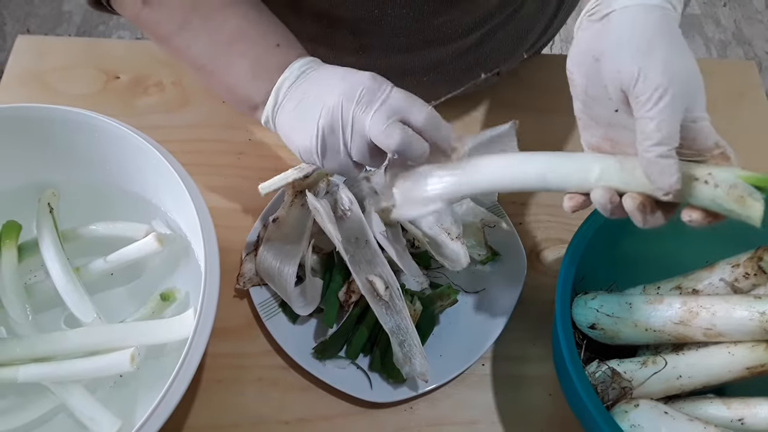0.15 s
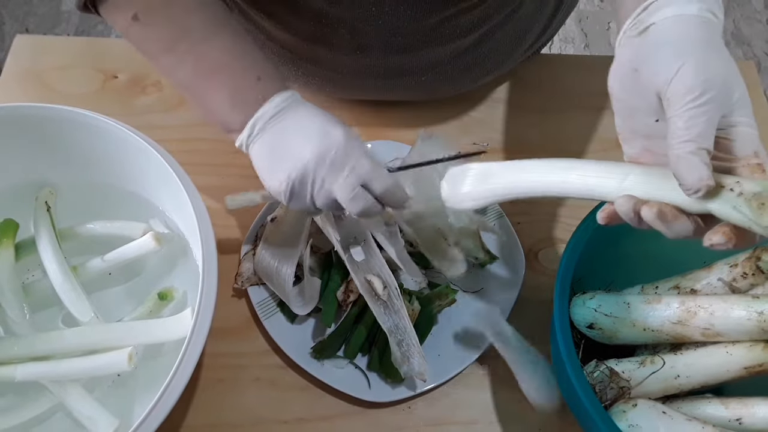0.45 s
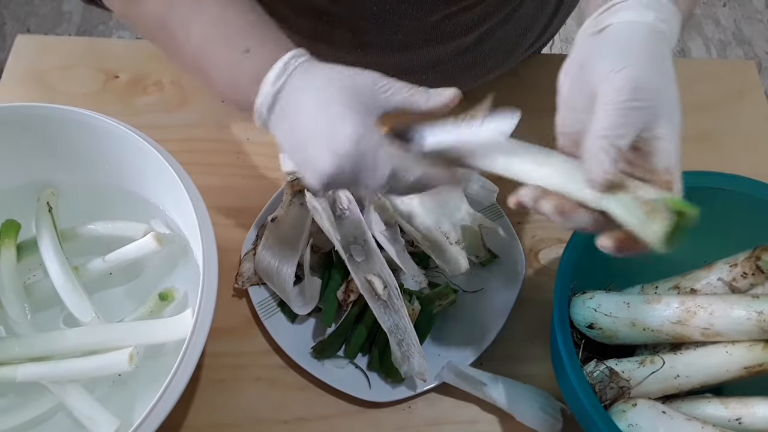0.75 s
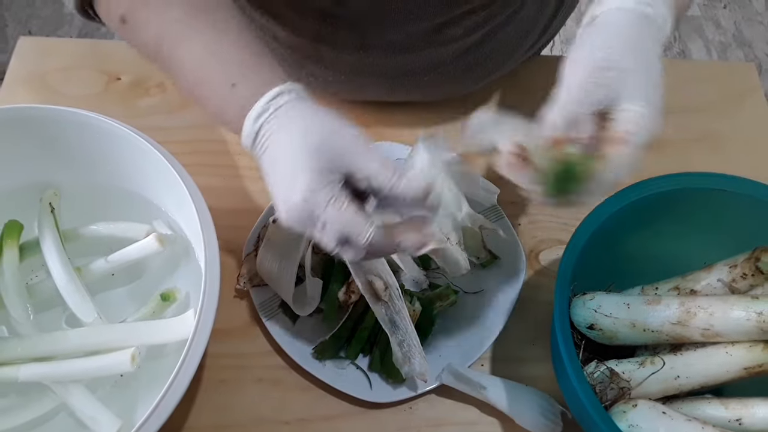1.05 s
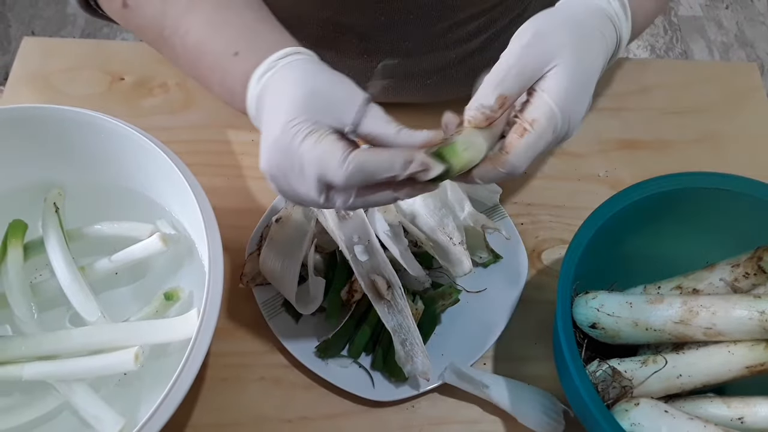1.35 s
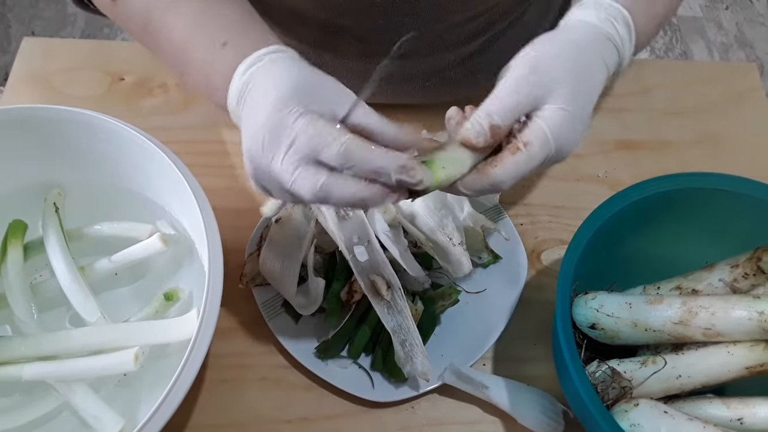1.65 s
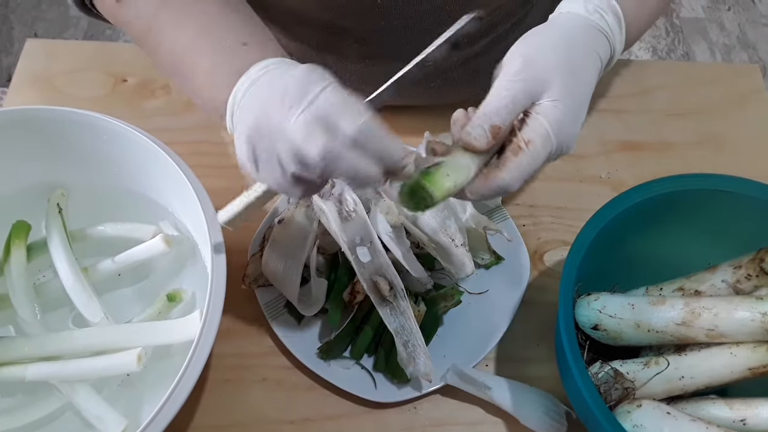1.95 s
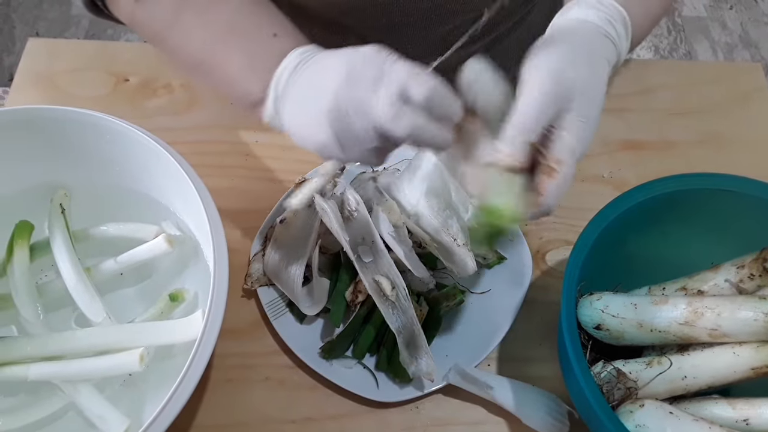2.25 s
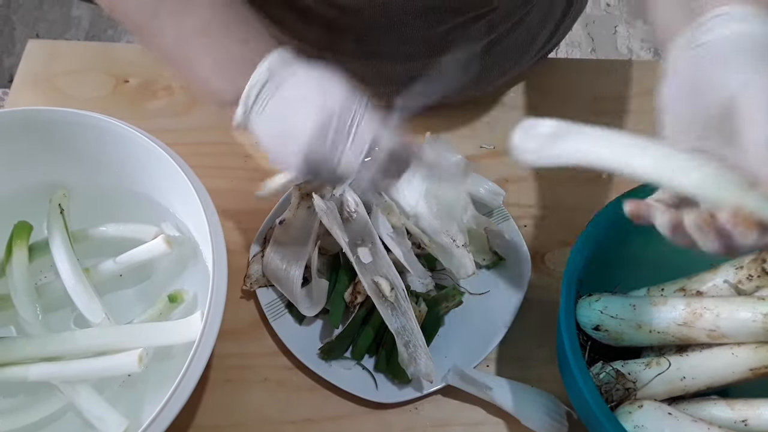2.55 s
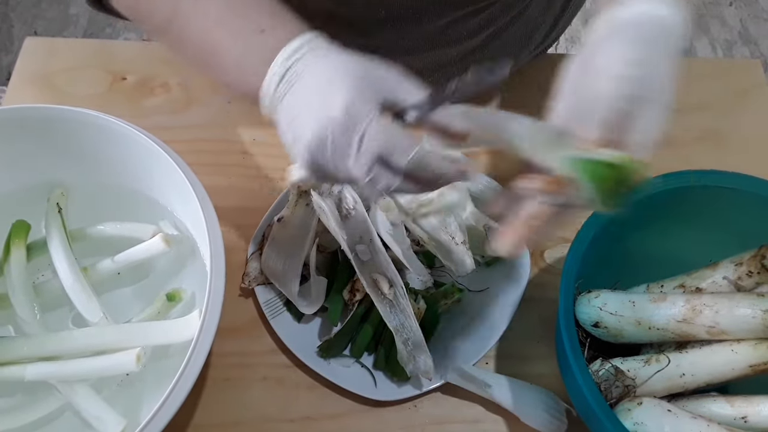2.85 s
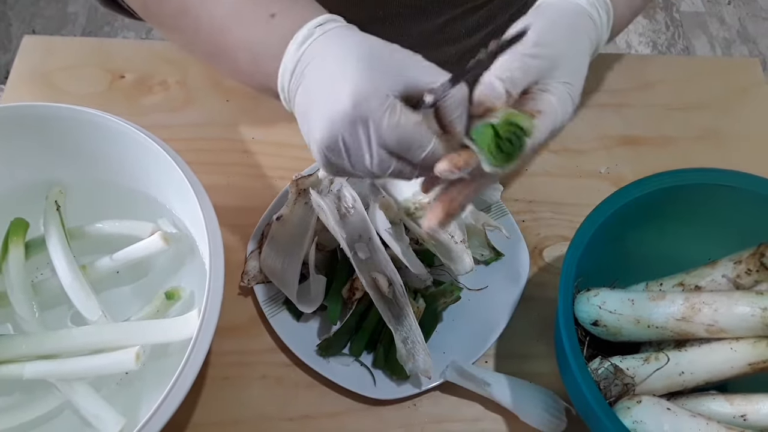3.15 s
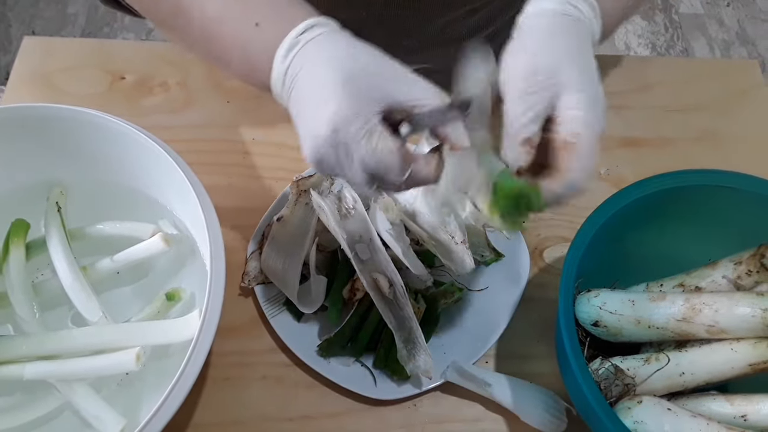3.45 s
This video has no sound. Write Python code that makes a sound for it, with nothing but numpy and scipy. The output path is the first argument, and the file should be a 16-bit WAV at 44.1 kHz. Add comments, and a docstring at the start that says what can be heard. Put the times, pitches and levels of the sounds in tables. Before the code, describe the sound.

Tough onion leaves tear in crisp, hissy, bright crackles. Light snaps open the scene, with trimmings knocking dully on plate and table from 0.14 to 0.7 seconds. Sparse faint ticks follow until 1.9, when ripping swells, strongest at 2.2-2.5. After a lull, sharp dense tearing resumes from 3.1 to the end. Quiet room noise, low hum, very faint whines and a short echo surround the close, slightly ringing microphone.

```python
"""Tearing onion leaves

Gloved hands tear the tough outer leaves off long onions over a plate in a quiet kitchen.
Snapping fibres are short bursts of noise, with louder single cracks; trimmings knock on plate and
table, made of resonances struck and kept rough by noise. Room noise, a hum and two thin whines
lie below, a noise tail is the room's echo, and the small microphone rings near 8 kHz."""
import sys
import numpy as np
from scipy import signal
from scipy.fft import rfft, irfft
from scipy.io import wavfile
from scipy.ndimage import uniform_filter1d

SR = 44100
rng = np.random.default_rng(int(sys.argv[2]) if len(sys.argv) > 2 else 0)


def dump_mix(stems):
    """Bounce the given channels to the path in sys.argv[1] as a 16-bit WAV at rate SR."""
    frames = np.atleast_2d(stems).T  # one column per channel
    limited = np.clip(frames, -1, 1)  # hard clip at full scale
    pcm = np.round(limited * 32767).astype(np.int16)
    wavfile.write(sys.argv[1], SR, pcm)


N = 158760

MIC_FLAT_DB = -16  # the microphone away from its resonance


def amp(db):
    """Turn decibels into a gain."""
    return 10 ** (np.asarray(db, float) / 20)


def unit(x):
    """Scale a signal to an rms of 1."""
    return x / np.sqrt(np.mean(x ** 2))


def band(x, low_hz, high_hz):
    """Keep only the frequencies between two limits."""
    return signal.sosfilt(signal.butter(2, [low_hz, high_hz], "band", fs=SR, output="sos"), x)


def peak(x, hz, width_hz):
    """One resonance, with a gain of 1 at its centre."""
    return signal.lfilter(*signal.iirpeak(hz, hz / width_hz, SR), x)


def fade(count, t60_s):
    """Exponential decay that falls by 60 dB in t60_s."""
    return 1000. ** (-np.arange(count) / SR / t60_s)


def walk(rate_hz):
    """Random levels, each held for 1 / rate_hz seconds, with smoothed steps and an rms of 1."""
    hold = int(SR / rate_hz)
    levels = rng.standard_normal(N)[:N // hold + 1]
    steps = np.repeat(levels, hold)[:N]
    return unit(uniform_filter1d(steps, hold // 2 + 1))


def mic(x):
    """The microphone passes all sound evenly, while its port resonates narrowly on a wide skirt."""
    port_hz, width_hz, skirt_width_hz, skirt_db = 7895, 600, 2400, -10
    ringing = peak(x, port_hz, width_hz)
    skirt = amp(skirt_db) * peak(x, port_hz, skirt_width_hz)
    return amp(MIC_FLAT_DB) * x + ringing + skirt


def air():
    """Room noise is shaped noise that swells gently; the hum and two whines are unsteady sines."""
    # colour of the room noise before the microphone: (frequency [Hz], relative level per Hz [dB])
    noise_colour = [(25, -27), (50, -10.5), (120, -5.5), (330, -10.5), (700, -19.5), (1670, -24.5),
                    (3000, -31.5), (5600, -43), (8000, -41.5), (11000, -78), (14000, -38), (16000, -36)]
    # hum and whines before the microphone: (frequency [Hz], rms wander [Hz], middle peak level [dB])
    steady_tones = [(118, 3, -52), (10690, 30, -75), (13360, 45, -70)]
    noise_db, swell_db, flicker_db = -48.5, 1.5, 2.5
    hz_grid = np.arange(N // 2 + 1) * SR / N + 1  # 1 Hz added so that the logarithm exists
    rows = np.array(noise_colour)
    colour_db = np.interp(np.log(hz_grid), np.log(rows[:, 0]), rows[:, 1])
    noise = irfft(rfft(rng.standard_normal(N)) * amp(colour_db), N)
    tones = 0
    for hz, wander_hz, db in steady_tones:
        loudness = amp(db + flicker_db * walk(45))
        phase = 2 * np.pi * np.cumsum(hz + wander_hz * walk(230)) / SR
        tones = tones + loudness * np.sin(phase)
    return amp(noise_db + swell_db * walk(1.0)) * unit(noise) + tones


def room(x):
    """The room answers with a dense tail of echoes that dies sooner in the treble."""
    room_db, low_t60_s, high_t60_s, delay_s = -5.5, 0.78, 0.48, .004
    noise = rng.standard_normal(SR)
    low = signal.lfilter(*signal.butter(1, 3000, fs=SR), noise)
    tail = low * fade(SR, low_t60_s) + (noise - low) * fade(SR, high_t60_s)
    tail = np.r_[np.zeros(int(delay_s * SR)), tail / np.sqrt(np.sum(tail ** 2))]
    return amp(room_db) * signal.fftconvolve(x, tail)[:N]


def ring(modes, chance):
    """A struck body rings in its modes, kept rough by a rattle that is also heard between them."""
    strike = 60  # first push, in units of the rattle
    spread_db, width_hz, rattle_db, rattle_t60_s = 2, 36, -21, .3
    shake = np.r_[strike, chance[1:]]
    x = 0
    for (hz, db, t60_s), luck in zip(modes, chance):
        # every hit excites each mode a little differently
        x = x + amp(db + spread_db * luck) * peak(shake, hz, width_hz) * fade(len(shake), t60_s)
    rattle = band(chance, 300, 2400) * fade(len(shake), rattle_t60_s)
    x = x + amp(rattle_db) * rattle
    return x / np.abs(x).max()


def knocks():
    """Landing trimmings give a tick and a plate ring, both dull if soft, and a thud of the table."""
    # landings: (time [s], tick's peak level away from the microphone's resonance [dB], tick pitch [Hz],
    # plate ring against tick before softening [dB], top of the softened sound [Hz],
    # table thud against tick before its band limits [dB])
    landings = [(.140, -33.5, 1430, -2.5, 2650, -11), (0.368, -35, 2940, -10, 5000, -7),
                (0.383, -41, 2800, -31, 3900, -13), (0.449, -28, 2300, -9, 2580, -1.5),
                (0.476, -41, 2400, -10, 2840, 1), (0.509, -47, 2930, -14, 2800, 12.5),
                (0.615, -36.5, 2830, 7.5, 9500, 1.5), (0.684, -55, 2000, 15, 9150, 19)]
    # ways the plate rings: (frequency [Hz], middle relative level [dB], decay by 60 dB [s])
    plate_modes = [(1540, -2, .3), (1950, -8, .12), (2330, -4, .3), (2546, 0, .5), (3120, -10, .12),
                   (3450, -7, .4), (4377, -14, .3), (5445, -15, .3), (6630, -19, .3)]
    # ways the table top rings: (frequency [Hz], middle relative level [dB], decay by 60 dB [s])
    table_modes = [(115, -2, .2), (200, -5, .15), (265, 0, .2), (325, -3, .2), (400, -5, .15),
                   (500, -5, .15)]
    tick_t60_s, tick_width = .014, .6  # width as a share of the tick's pitch
    out = np.zeros(N)
    chances = rng.standard_normal((len(landings), SR // 2))
    for (s, db, hz, ring_db, top_hz, thud_db), chance in zip(landings, chances):
        soften = signal.butter(4, top_hz, fs=SR)
        push = np.r_[4, chance[1:]] * fade(len(chance), tick_t60_s)
        tick = peak(peak(push, hz, hz * tick_width), hz, 2 * hz)
        tick = signal.lfilter(*soften, tick)
        plate = signal.lfilter(*soften, ring(plate_modes, chance))
        # shifted noise makes the table rattle differently from the plate
        thud = band(ring(table_modes, np.roll(chance, 20)), 61, 1200)
        hit = tick / np.abs(tick).max() + amp(ring_db) * plate + amp(thud_db) * thud
        out[int(s * SR):][:len(chance)] += amp(db - MIC_FLAT_DB) * hit
    return out


def band_db(rows):
    """Turn (level, three levels against it) into the level of each of the four bands."""
    main = rows[:, :1]
    return main + np.c_[0 * rows[:, 0], rows[:, 1:]]


def leaf(x, k, grip=1):
    """Filter noise to one band of leaf sound; the hollow stalk colours the low band, more when gripped."""
    # main, low, middle and top band: (lower limit [Hz], upper limit [Hz])
    band_limits = [(6000, 10000), (800, 2300), (2300, 6000), (10000, 15500)]
    stalk_hz, stalk_width_hz, stalk_flat_db = 1600, 420, -6
    if k == 0:  # gentler slopes for the main band
        return signal.lfilter(*signal.butter(1, band_limits[k], "band", fs=SR), x)
    y = band(x, *band_limits[k])
    if k == 1:
        return amp(stalk_flat_db) * y + grip * peak(y, stalk_hz, stalk_width_hz)
    return y


def cracks():
    """Each loud snap is a sudden click on a short noise tail with its own colour."""
    # snaps through the microphone: (time [s], peak level of 6-10 kHz [dB], then against that level:
    # 800-2300 Hz [dB], 2300-6000 Hz [dB], 10-15.5 kHz [dB])
    loud_snaps = [(0.0308, -33, -20, -17, -17), (0.0433, -35, -21, -14, -20), (0.0524, -29, -24, -13, -24),
                  (0.0643, -34, -16, -6, -16), (0.2529, -30, -40, -20, -12), (0.3309, -37, -8, -3, -11),
                  (0.8292, -42, -17, -16, -27), (1.3555, -48, -12, -15, -15), (1.3923, -45, -18, -4, -24),
                  (1.484, -54, -1, -1, -16), (1.5204, -46, -25, -15, -18), (1.643, -62, -10, 7, -6),
                  (1.8574, -41, -38, -15, -11), (1.8749, -51, -17, 6, -17), (1.92, -33, -34, -16, -21),
                  (1.9335, -24, -33, -11, -19), (1.9629, -26, -40, -19, -16), (1.9733, -26, -30, -14, -13),
                  (2.0219, -24, -20, -16, -15), (2.0384, -26, -41, -18, -9), (2.0794, -20, -29, -12, -13),
                  (2.1454, -30, -21, -10, 1), (2.158, -23, -31, -16, -2), (2.1729, -21, -23, -11, -5),
                  (2.1803, -21, -5, 1, -10), (2.1925, -19, -31, -7, -1), (2.206, -21, -23, -14, 0),
                  (2.2345, -15, -19, -7, -5), (2.2572, -18, -21, -4, -8), (2.2717, -20, -21, 1, -4),
                  (2.2846, -13, -26, -11, -6), (2.2985, -18, -18, -5, -3), (2.308, -16, -24, -15, -10),
                  (2.3246, -17, -26, -12, -7), (2.338, -16, -27, -16, -10), (2.4061, -19, -25, -15, -17),
                  (2.4578, -20, -26, -9, -6), (2.4608, -15, -26, -7, -3), (2.4625, -17, -26, -4, -14),
                  (2.7673, -40, -22, -8, -26), (3.0126, -46, -21, -19, -24), (3.0724, -43, -26, -12, -11),
                  (3.0994, -17, -23, -17, -25), (3.1152, -22, -14, -9, -6), (3.1312, -21, -20, -9, -3),
                  (3.1379, -20, -39, -9, -8), (3.1446, -17, -17, -5, -20), (3.1898, -15, -27, -12, -14),
                  (3.2157, -10, -28, -14, 1), (3.2204, -17, -34, -18, -1), (3.2309, -27, -35, -14, 4),
                  (3.2444, -17, -19, -12, -11), (3.2527, -22, -29, -22, -6), (3.317, -22, -30, -14, -12),
                  (3.3272, -15, -31, -15, -7), (3.332, -19, -28, -14, -10), (3.4116, -18, -24, -9, -4),
                  (3.4175, -20, -20, -9, -8), (3.4305, -17, -20, -8, -3), (3.4477, -15, -21, -12, -12),
                  (3.4658, -18, -23, -12, -12), (3.5071, -17, -25, -14, -19), (3.5201, -17, -19, -13, -14),
                  (3.53, -18, -37, -15, -11), (3.5459, -21, -12, -3, -5)]
    # time in which the tail falls by 60 dB: one value for each band, main, low, middle, top [s]
    tail_t60 = [.013, .018, .009, .005]
    attack_s = .0006  # rise of the tail, and moment of the click
    click_db = 18  # brighter snaps click harder, dull ones are bursts
    count = 2048
    rows, out = np.array(loud_snaps), np.zeros(N + count)
    noises = rng.standard_normal((len(rows), count))
    noises *= 1 - np.exp(-np.arange(count) / SR / attack_s)
    noises[:, int(attack_s * SR)] = amp(click_db + rows[:, -1] / 2)
    for s, dbs, noise in zip(rows[:, 0], band_db(rows[:, 1:]), noises):
        for k, t60_s in enumerate(tail_t60):
            x = leaf(noise * fade(count, t60_s), k)
            out[int(s * SR):][:count] += x / np.abs(mic(x)).max() * amp(dbs[k])
    return out[:N]


def tearing():
    """Dense fibre snaps of uneven size and colour burst over a rustle, coming in surges."""
    # course of the tearing: (time [s], level setting of 6-10 kHz [dB], then against that level:
    # 800-2300 Hz [dB], 2300-6000 Hz [dB], 10-15.5 kHz [dB])
    tear_course = [(0, -53, -4.5, -6.5, -19), (0.1, -67, 11.5, 1, -14), (0.123, -48, -11, -6, -25),
                   (0.16, -59.5, -5, 4, -21), (0.24, -60.5, 4.5, -9, -22), (0.264, -56.5, 1.5, 3, -22),
                   (0.385, -53.5, -5.5, -24, -23), (0.43, -56.5, 3.5, -3.5, -23),
                   (0.8, -63, -4.5, -13, -12), (1.3, -68, 5, -4, -14), (1.37, -61, -0.5, -4, -24),
                   (1.55, -60.5, -13, -8.5, -15), (1.8, -70, -20, -37, -11), (1.9, -52.5, -27, -30, -35),
                   (1.93, -50.5, -29, -20, -29), (2.081, -39.5, -18, -12.5, -19),
                   (2.131, -52.5, -18, -26, -2), (2.161, -34, -20.5, -9.5, -7),
                   (2.3, -29, -27.5, -9.5, -12), (2.444, -38.5, -13, -7, -20), (2.48, -51, -9.5, -9.5, -31),
                   (2.7, -64, -5, 0.5, -28), (3.076, -63.5, -8, -16, -12), (3.104, -38.5, -13.5, -6, -36),
                   (3.17, -41.5, -11.5, 0, -15), (3.2, -40, -21, -11, -20), (3.27, -38.5, -22, -7.5, -11),
                   (3.37, -38, -23, -24, -17), (3.411, -28.5, -21.5, -9, -14),
                   (3.49, -34, -22.5, -12.5, -17), (3.55, -29, -19.5, -8.5, -21), (3.6, -48, -27, -11, -20)]
    # time in which a snap falls by 60 dB: one value for each band, main, low, middle, top [s]
    snap_t60 = [.002, .006, .0025, .0012]
    snaps_per_s, size_spread_db, size_most_db, colour_spread_db = 960, 5, 7, 4
    rustle_db, surge_db, surges_per_s = -5, 1.5, 63
    snapping_from_db, snap_db_per_db = -50, .5  # below this level, snaps weaken against the rustle
    handling_db = -6  # low rumble of the grip, against the 800-2300 Hz band
    rows, t = np.array(tear_course), np.arange(N) / SR
    happens = rng.random(N) < snaps_per_s / SR
    snaps = happens * amp(np.minimum(size_spread_db * rng.exponential(size=N), size_most_db))
    noise = amp(surge_db * walk(surges_per_s)) * rng.standard_normal(N)
    dbs = [np.interp(t, rows[:, 0], db) for db in band_db(rows[:, 1:]).T]
    force = amp(np.minimum(snap_db_per_db * (dbs[0] - snapping_from_db), 0))
    out = 0
    for k, t60_s in enumerate(snap_t60):
        coloured = snaps * amp(colour_spread_db * rng.uniform(-1, 1, N))
        # the power of every snap decays and adds to that of the others
        keep_power = 1e-6 ** (1 / t60_s / SR)
        burst = np.sqrt(signal.lfilter([1], [1, -keep_power], coloured ** 2))
        grip = force ** 4 * amp(surge_db * 2 * walk(surges_per_s / 2))
        x = leaf((force * unit(burst) + amp(rustle_db)) * noise, k, grip)
        out = out + x / np.std(mic(x)) * amp(dbs[k])
    rumble = unit(band(noise, 164, 596))
    return out + rumble * amp(dbs[1] + handling_db - MIC_FLAT_DB)


def scene():
    """Hands, plate and room reach both channels alike."""
    near = tearing() + cracks() + knocks()
    return np.tile(near + room(near) + air(), (2, 1))


def record(dry):
    """The microphone colours the sound, then a steep filter cuts everything above 15750 Hz."""
    top_cut = signal.ellip(10, .2, 80, 15750, fs=SR, output="sos")
    return signal.sosfilt(top_cut, mic(dry))


dry = scene()
out = record(dry)
dump_mix(out)
```